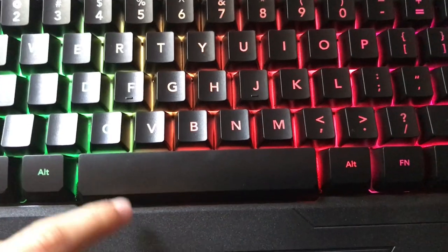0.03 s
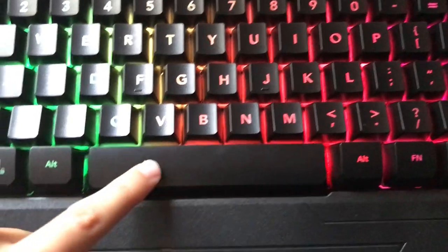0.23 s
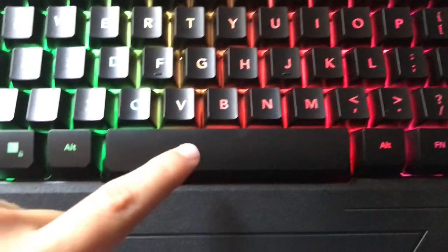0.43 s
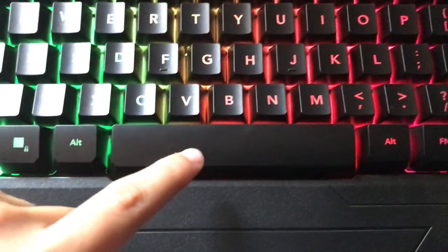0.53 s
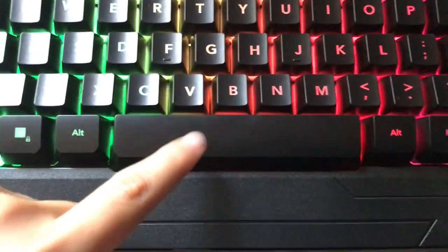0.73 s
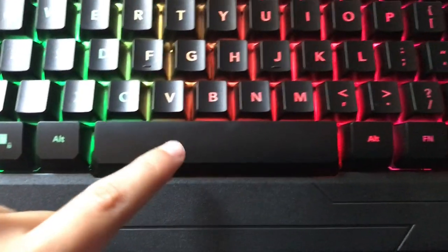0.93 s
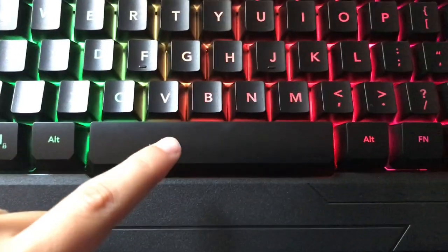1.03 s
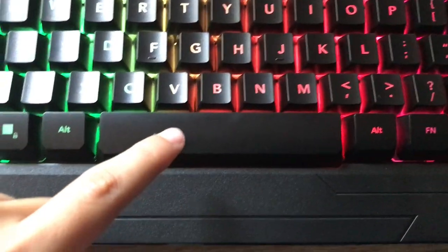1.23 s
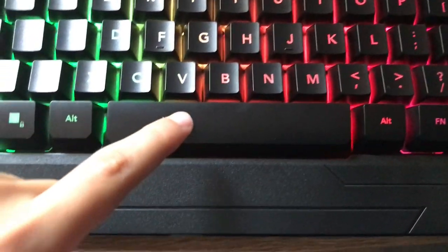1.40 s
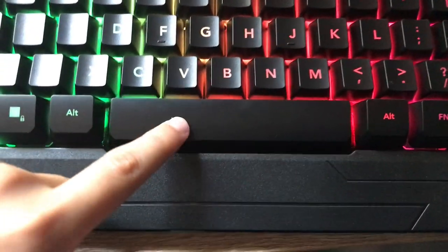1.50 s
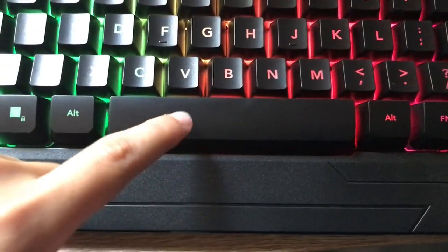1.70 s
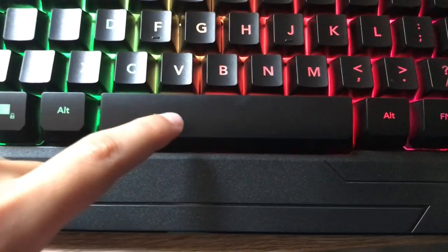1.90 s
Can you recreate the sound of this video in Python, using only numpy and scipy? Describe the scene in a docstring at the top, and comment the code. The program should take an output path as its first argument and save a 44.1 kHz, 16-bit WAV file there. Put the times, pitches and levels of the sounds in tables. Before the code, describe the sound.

A keyboard space bar clacks three times, close up, at about 0.2, 0.8 and 1.5 seconds. Each press is a quick finger tap running into a sharp plastic clack, with a faint spring ring and slight desk thud. The bar rattles back up more softly at about 0.4, 0.9 and 1.6 seconds, the last release being quietest. Faint low rumble and electrical hum lie underneath in a small, quiet room.

```python
"""Three close clacks of a keyboard's space bar, pressed by a finger in a quiet room.
Each press is a tap that takes up the bar's slack, then a clack as it bottoms out and shakes the desk.
On release the bar and its stabiliser wire rattle back up. A low rumble and mains hum lie underneath."""
import sys
import numpy as np
from scipy import signal
from scipy.fft import rfft, irfft
from scipy.io import wavfile
from scipy.ndimage import uniform_filter1d

SR = 44100
rng = np.random.default_rng(int(sys.argv[2]) if len(sys.argv) > 2 else 0)


def inscribe(sig):
    """Save sig as 16-bit PCM at rate SR to the path in sys.argv[1].

    A 1-D sig is mono; a 2-D sig holds one channel per row.
    Samples are clipped to [-1, 1] before scaling.
    """
    pcm = np.round(np.clip(np.atleast_2d(sig).T, -1, 1) * 32767)
    wavfile.write(sys.argv[1], SR, pcm.astype(np.int16))


N = 85995

# bottom-outs: t/s, level/dB, bass/dB, presence/dB, treble/dB
BOTTOMS = [(.2310, -28.5, 2.5, -3, 1), (0.7989, -31, -2.5, -12, 1.5), (0.8012, -30.5, 2.5, -3.5, -3.5),
           (1.4867, -37.5, -6.5, -7, -2.5), (1.4893, -34, 0, -9, -7.5)]
# burst spectrum: f/Hz, level/dB
BOTTOM_COLOUR = [(100, -4), (200, -5), (450, -16), (700, -6.5), (950, -4.5), (1250, -5.5), (2100, 0.5),
                 (3400, -1), (5200, 0.5), (6700, -13.5), (10000, -13.5), (13500, -13.5), (16000, -12.5)]
# spring modes: f/Hz, level/dB, t60/s
SPRING_MODES = [(1745, -38, 0.2), (1836, -26.5, .25), (1900, -37.5, 0.18), (4500, -41, .22),
                (5020, -43, .22)]


def bottom_outs():
    """The bar hits bottom, sometimes one end after the other; the spring rings faintly."""
    out = np.zeros(N)
    for s, db, *tone_db in BOTTOMS:
        clack = contact(BOTTOM_COLOUR, "bottom", tone_db, ring_db=-5.5, crack=.65, travel_s=.00052)
        add(out, s, amp(db) * clack)
        add(out, s, amp(db) * ringing(SPRING_MODES))
    return out


# finger landings: t/s, level/dB, bass/dB, presence/dB, treble/dB
TAPS = [(.2157, -32.5, 2.5, -8, -7.5), (.7854, -32, 0.5, -4.5, -1), (1.4739, -31.5, 0, -2.5, -9)]
# burst spectrum: f/Hz, level/dB
TAP_COLOUR = [(100, -17), (450, -19.5), (750, -14.5), (1000, -12), (1300, -6.5), (1600, -5.5), (2000, 2),
              (2420, -6.5), (2800, -10.5), (4000, -4.5), (5400, -8), (7200, -19.5), (10000, -16.5),
              (12500, -11), (16000, -21)]


def finger_taps(scuff_db=-55, scuff_lead_s=.0012):
    """Skin scuffs the bar just before the finger lands on it."""
    out = np.zeros(N)
    for s, db, *tone_db in TAPS:
        scuff = contact(TAP_COLOUR, "tap", (0, 0, 0), ring_db=-2.5, crack=0, travel_s=.0007)
        tap = contact(TAP_COLOUR, "tap", tone_db, ring_db=-4.5, crack=.1, travel_s=.0022)
        add(out, s - scuff_lead_s, amp(scuff_db) * scuff)
        add(out, s, amp(db) * tap)
    return out


# rebound hits: t/s, level/dB, bass/dB, presence/dB, treble/dB
RATTLES = [(0.3642, -52.5, -6, 5.5, -3), (0.3713, -36.5, 1, -1, -10.5), (0.3755, -39, -0.5, 8, 0.5),
           (.3835, -34.5, -3.5, 6, -3), (.3935, -48, 7, 2, -18), (.9000, -56, 4, 9, -13),
           (.9030, -39.5, 11.5, -1.5, -17), (.9078, -46.5, -1.5, 10.5, -5), (.9130, -43, 12, 1, -3.5),
           (0.9163, -38.5, -17, 2.5, -5), (.9205, -40, -7, 6.5, -7), (.9258, -46.5, -1.5, 7, -4),
           (.9332, -50, -7, 1, -1), (.9368, -51, -14, 6, -5), (1.5980, -49, -1, -3, -11),
           (1.6002, -53, -7.5, 0, -1), (1.6032, -46.5, 10.5, 11, -6.5), (1.6052, -46.5, 0.5, 7.5, -2),
           (1.6113, -48.5, 5.5, 7.5, -16), (1.6131, -45.5, -8, 9.5, -3.5), (1.6175, -46, 1.5, 4.5, -24),
           (1.6327, -51.5, -17.5, 6, -7.5)]
# finger shifts: t/s, level/dB, bass/dB, presence/dB, treble/dB
SHIFTS = [(0.0232, -66, 13, 5, -22), (0.3275, -54.5, 12, -4, -22), (0.3498, -60, 2, -8, -23),
          (1.5520, -58, 14.5, -32, -17)]
# burst spectrum: f/Hz, level/dB
RATTLE_COLOUR = [(100, -5.5), (230, -2.5), (420, -7.5), (700, -19.5), (900, -9.5), (1300, -0.5), (2100, 4),
                 (3200, -2.5), (5000, -4.5), (7200, -9.5), (12000, -1), (16000, -2.5)]


def rattles():
    """The bar rattles as it springs back and ticks softly as the finger shifts."""
    out = np.zeros(N)
    for s, db, *tone_db in RATTLES + SHIFTS:
        hit = contact(RATTLE_COLOUR, "rattle", tone_db, ring_db=-8, crack=.3, travel_s=.0007, damping=1.1)
        add(out, s, amp(db) * hit)
    return out


# bar and case modes: f/Hz, t60/s before the cap, tap level/dB, bottom level/dB, rattle level/dB
BAR_MODES = [(649, 0.11, -13.5, -11, -11), (720, .04, -10.5, -10.5, -12), (792, 0.11, -18, -22, -14),
             (1232, .035, -9, -6, -8), (1341, 0.033, -12.5, -11, -6.5), (1640, 0.018, -12.5, -35, -27),
             (1954, 0.011, -5.5, -3, -13), (2087, 0.016, -4, -4.5, -5), (2656, 0.032, -6, -9, -22),
             (2922, 0.021, -23, -5, -13), (3873, 0.025, -4.5, -25, -10), (4080, 0.015, -7, -9.5, -14),
             (4720, 0.0233, -28.5, -9.5, -50), (4935, 0.015, -18.5, 0, -18.5)]
# plastic decay: f/Hz, t60/s before damping
PLASTIC_DECAY = [(150, 0.036), (700, 0.057), (1500, 0.016), (4000, 0.036), (8000, 0.024), (15000, 0.014)]
# bass, mid, presence and treble points: f/Hz
TONE_HZ = (800, 1800, 4500, 11000)
T60_CAP_S = .042


def contact(colour, kind, tone_db, ring_db, crack, travel_s, damping=1.25, size=8192):
    """One hit on the bar: a sharp crack, a dense burst of plastic resonances and the main modes."""
    t, hz = np.arange(size) / SR, np.fft.rfftfreq(size, 1 / SR)
    burst, ring = np.zeros(size), np.zeros(size)
    for f, share, noise in bands(rng.standard_normal(size)):
        shape = bending_envelope(t, f, lookup(PLASTIC_DECAY, f) / damping, travel_s)
        burst += np.sqrt(share) * unit(noise * shape)
    burst[0] += crack
    lumps_db = 10 * np.log10(uniform_filter1d(abs(rfft(burst)) ** 2, size=70) + 1e-9)
    burst = unit(coloured(burst, lookup(colour, hz) - lumps_db))  # flatten, then colour
    column = ("tap", "bottom", "rattle").index(kind)
    for f, t60, *levels_db in BAR_MODES:
        shape = bending_envelope(t, f, min(t60, T60_CAP_S), travel_s)
        ring += amp(levels_db[column]) * unit(shape * sine(f, t))
    bass, presence, treble = tone_db
    tone = list(zip(TONE_HZ, (bass, 0, presence, treble)))
    body = coloured(burst + amp(ring_db) * ring, lookup(tone, hz))
    return body * np.sqrt(.003 * SR)  # energy 1 -> RMS 1 over 3 ms


def bending_envelope(t, hz, t60, travel_s, rise_s=.0003):
    """A bending wave arrives, swells and dies, treble first; travel_s and rise_s hold at 1 kHz."""
    slowness = 1000 / hz
    age = np.maximum(t - travel_s * min(slowness, 2), 0)
    return (1 - np.exp(-age / (rise_s * slowness))) * decay(age, t60)


# hollow knocks: t/s, level/dB, f/Hz
CASE_KNOCKS = [(.3290, -58, 770), (.3485, -52.5, 765), (.3735, -42, 650), (.3920, -49, 752),
               (.9028, -37.5, 628), (.9105, -45.5, 453), (.9225, -48.5, 752), (1.6020, -42, 727)]


def case_knocks(rise_s=.0042, t60_s=.022):
    """A low case mode swells over a few cycles as the finger eases and the bar lifts."""
    out, t = np.zeros(N), np.arange(SR // 8) / SR
    shape = (1 - np.exp(-(t / rise_s) ** 2)) * decay(t, t60_s)
    for s, db, hz in CASE_KNOCKS:
        add(out, s, amp(db) * shape / shape.max() * np.sin(2 * np.pi * hz * t))
    return out


# thin ticks: t/s, level/dB, centre f/Hz
PART_TICKS = [(0.2148, -42, 12800), (0.375, -54, 13600), (0.7853, -44, 12600), (0.9094, -38.5, 14800),
              (0.9078, -48, 12500), (0.9338, -54, 13900), (1.4728, -37.5, 13400)]


def part_ticks(sigma_hz=3100, t60_s=.0066, size=1024):
    """Small parts tick: bursts of very high fizz that die in milliseconds."""
    out, t, hz = np.zeros(N), np.arange(size) / SR, np.fft.rfftfreq(size, 1 / SR)
    for s, db, centre_hz in PART_TICKS:
        band = np.exp(-.5 * ((hz - centre_hz) / sigma_hz) ** 2)
        fizz = irfft(rfft(rng.standard_normal(size)) * band)
        add(out, s, amp(db) * np.sqrt(size) * unit(fizz) * decay(t, t60_s))
    return out


# pushes on the desk: t/s, level/dB
THUMPS = [(.2345, -51.5), (0.8089, -48.5), (0.9056, -67), (1.4922, -47)]
# desk modes: f/Hz, level/dB, t60/s
DESK_MODES = [(85.7, 2, 0.11), (130, 4.5, 0.15), (171.5, -0.5, 0.12), (215.3, -0.5, .12), (312, -4.5, 0.12)]


def desk(rise_s=.0054):
    """Firm strokes drive the low modes of the keyboard on the desk."""
    out, t = np.zeros(N), np.arange(SR // 2) / SR
    for s, db in THUMPS:
        add(out, s, amp(db) * ringing(DESK_MODES) * (1 - np.exp(-t / rise_s)))
    return out


# reverberation: f/Hz, level/dB, t60/s
ROOM_TAIL = [(150, -1, 0.19), (670, -17.5, 0.31), (1680, -18.5, 0.33), (2340, -20.5, .27), (4900, -18, .28),
             (7200, -15, 0.23), (15000, -20.5, .2)]


def room(x, tails=3, delay_s=.008):
    """Diffuse tails of a small room; feeds crossfade, so successive clicks meet different echoes."""
    out, t = np.zeros(N), np.arange(SR // 2) / SR
    half_turns = 8.3 * np.arange(N) / SR
    for k in range(tails):
        tail = np.zeros(len(t))
        for f, share, noise in bands(rng.standard_normal(len(t))):
            fading = unit(noise * decay(t, lookup(ROOM_TAIL, f, column=2)))
            tail += np.sqrt(share) * amp(lookup(ROOM_TAIL, f)) * fading
        feed = np.sqrt(2 / tails) * np.cos(np.pi * (half_turns + k / tails))
        add(out, delay_s, signal.fftconvolve(x * feed, tail))
    return out


# noise floor: f/Hz, relative level/dB
FLOOR_SPECTRUM = [(15, -71.5), (25, -52), (39, -16.5), (50, -12), (64, -13), (80, -5), (130, -7.5),
                  (165, -10.5), (263, -13.5), (416, -24), (641, -26.5), (796, -33), (1260, -34.5),
                  (2350, -37.5), (9070, -43), (16000, -45)]


def background(floor_db=-63.5, hum_db=-65.5, hum_hz=59.95):
    """Low room rumble, faint hiss and mains hum."""
    gain = amp(lookup(FLOOR_SPECTRUM, np.fft.rfftfreq(N, 1 / SR)))
    noise = irfft(rfft(rng.standard_normal(N)) * gain, N)
    hum = np.sqrt(2) * sine(hum_hz, np.arange(N) / SR)
    return amp(floor_db) * np.sqrt(N) * unit(noise) + amp(hum_db) * hum


def amp(db):
    return 10 ** (np.asarray(db) / 20)


def decay(t, t60):
    return np.exp(-np.log(1000) * t / t60)


def sine(hz, t):
    """Sine with random phase."""
    return np.sin(2 * np.pi * (hz * t + rng.random()))


def ringing(modes):
    """Sum of decaying partials."""
    t = np.arange(SR // 2) / SR
    return sum(amp(db) * decay(t, t60) * sine(f, t) for f, db, t60 in modes)


def lookup(points, hz, column=1):
    """Interpolate on a log-frequency axis."""
    table = np.array(points, float)
    return np.interp(np.log(hz + 1), np.log(table[:, 0] + 1), table[:, column])


def unit(x):
    """Scale to energy 1."""
    return x / np.sqrt(np.sum(x ** 2) + 1e-30)


def add(mix, start_s, sound):
    part = mix[round(start_s * SR):][:len(sound)]
    part += sound[:len(part)]


def bands(x, count=18):
    """Yield overlapping bands: centre f/Hz, share of the spectrum, signal."""
    hz, centres = np.fft.rfftfreq(len(x), 1 / SR), np.geomspace(120, 16000, count)
    for centre, pick in zip(centres, np.eye(count)):
        window = np.interp(hz, centres, pick)
        yield centre, window.mean(), irfft(rfft(x) * window, len(x))


def coloured(x, db):
    """Minimum-phase filter from dB per bin."""
    log_gain = np.log(amp(db))
    mirrored = np.r_[log_gain, log_gain[-2:0:-1]]
    response = np.exp(np.conj(signal.hilbert(mirrored)))
    return irfft(rfft(x) * response[:len(db)])


def scene():
    """Key, room, desk and background, in mono."""
    key = finger_taps() + bottom_outs() + rattles() + case_knocks() + part_ticks()
    return (key + room(key) + desk() + background())[None]


LOW_CUT_HZ, HIGH_CUT_HZ = 42, 16050


def record(dry):
    """Microphone bass roll-off, then the band limit."""
    highpass = signal.butter(4, LOW_CUT_HZ, "highpass", fs=SR, output="sos")
    lowpass = signal.firwin(255, HIGH_CUT_HZ, window=("kaiser", 9), fs=SR)
    return signal.oaconvolve(signal.sosfilt(highpass, dry), lowpass[None], "same")


dry = scene()
out = record(dry)
inscribe(out)
```